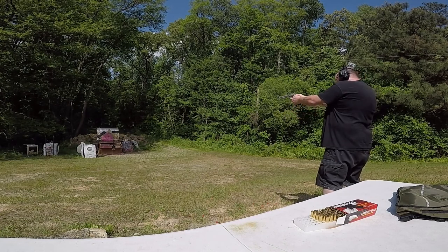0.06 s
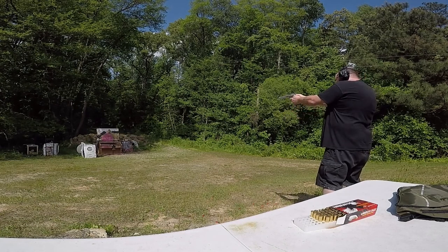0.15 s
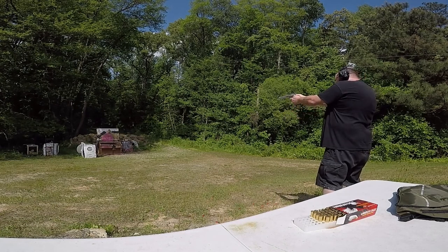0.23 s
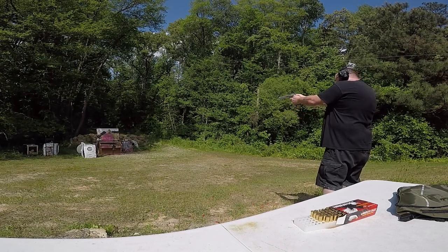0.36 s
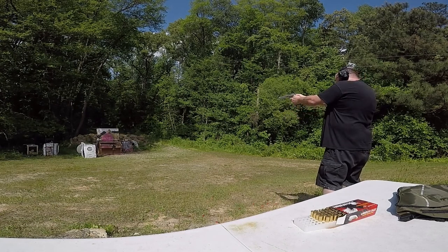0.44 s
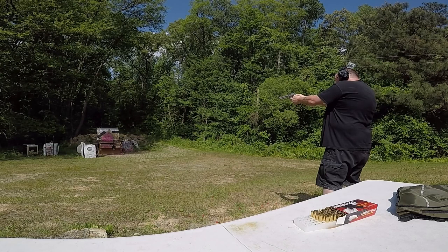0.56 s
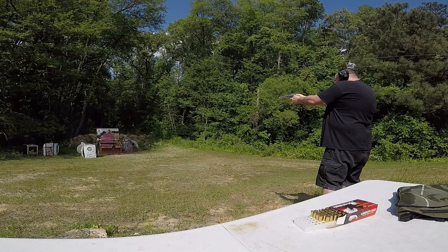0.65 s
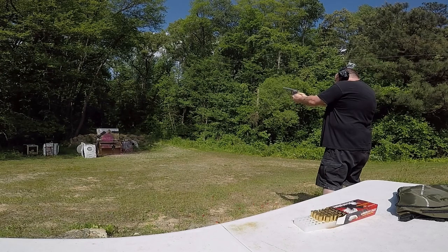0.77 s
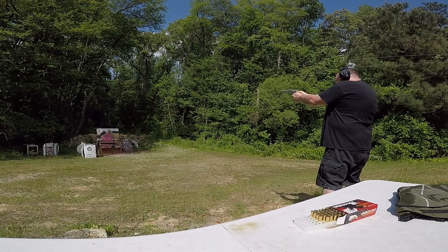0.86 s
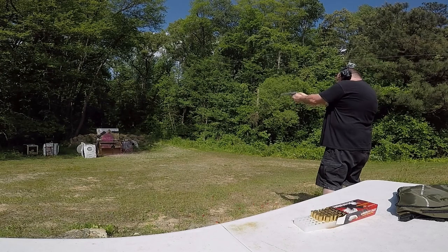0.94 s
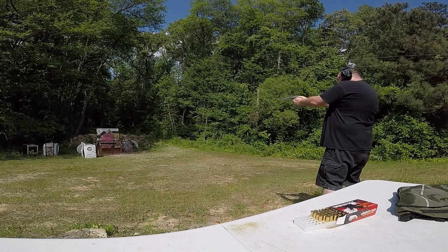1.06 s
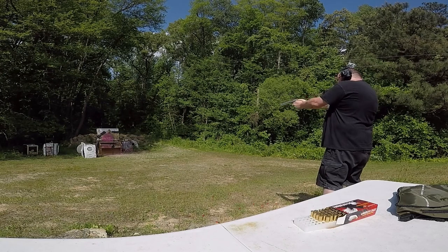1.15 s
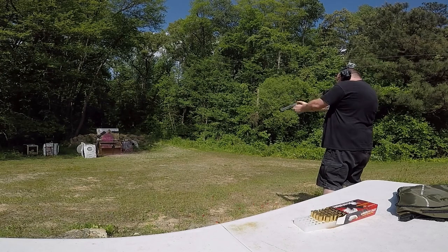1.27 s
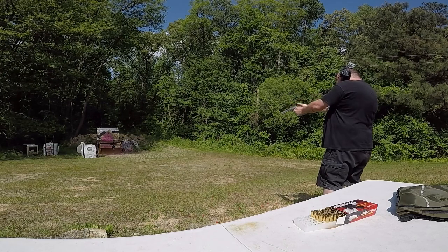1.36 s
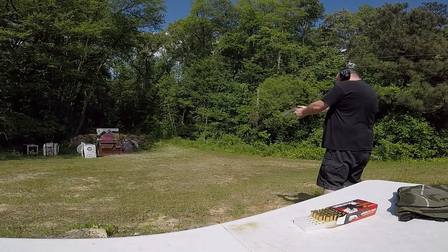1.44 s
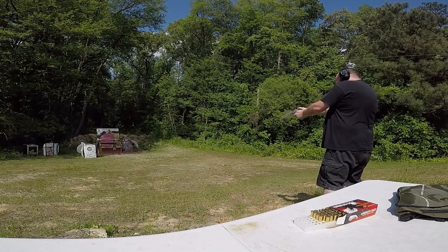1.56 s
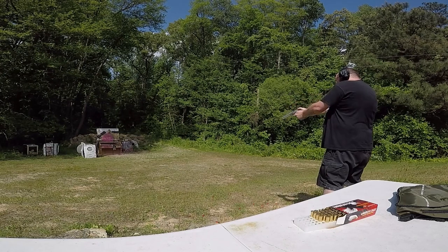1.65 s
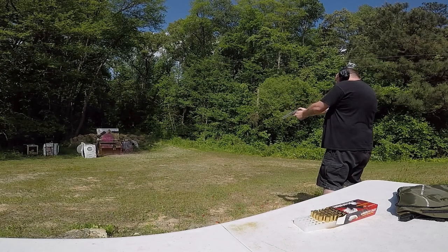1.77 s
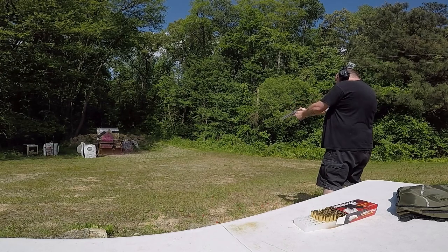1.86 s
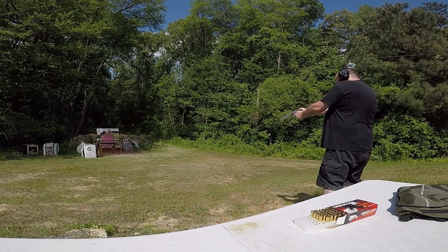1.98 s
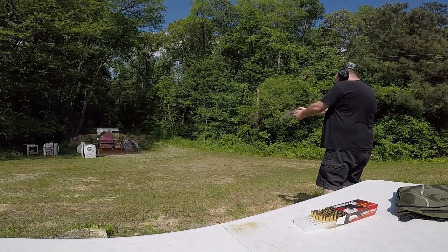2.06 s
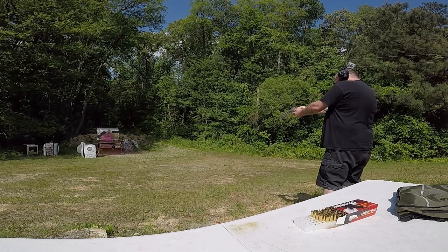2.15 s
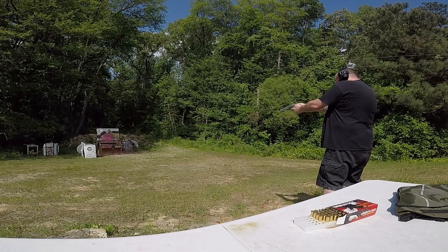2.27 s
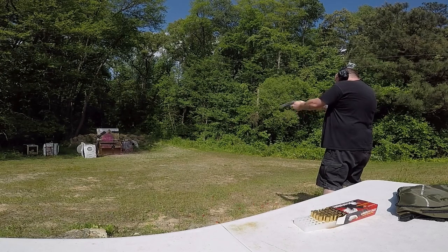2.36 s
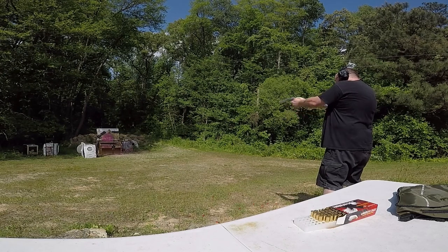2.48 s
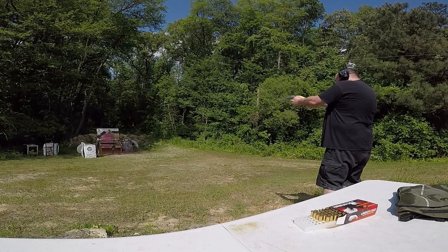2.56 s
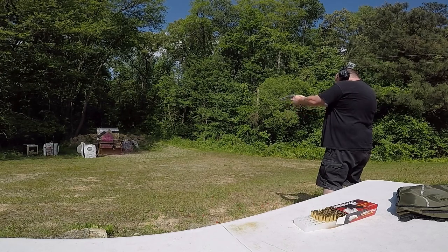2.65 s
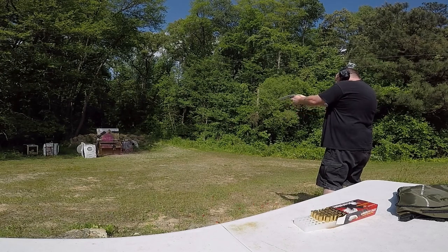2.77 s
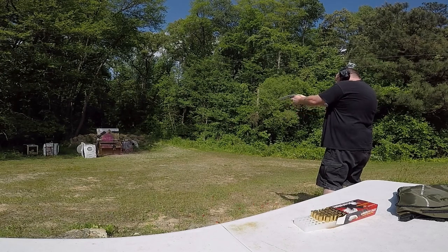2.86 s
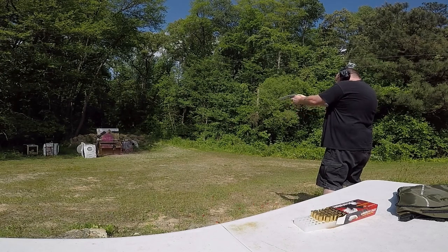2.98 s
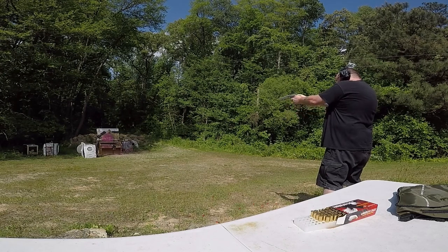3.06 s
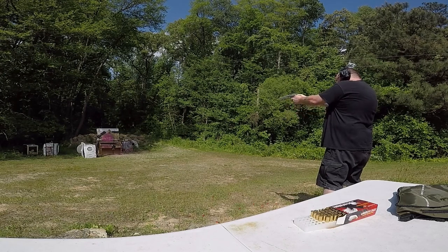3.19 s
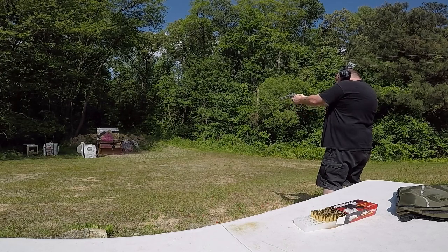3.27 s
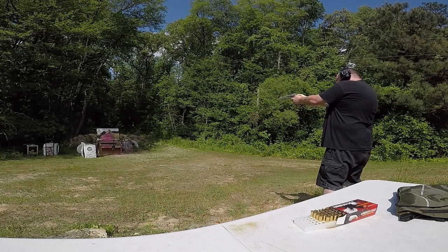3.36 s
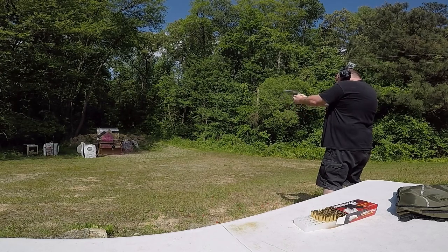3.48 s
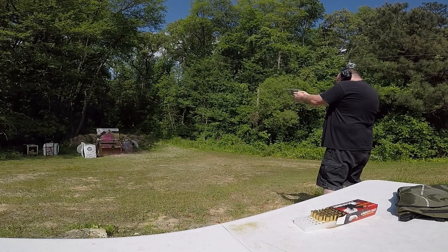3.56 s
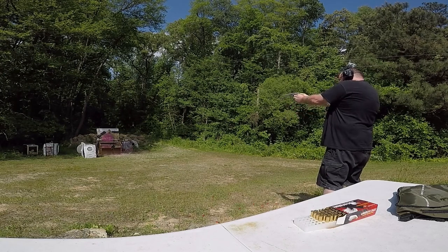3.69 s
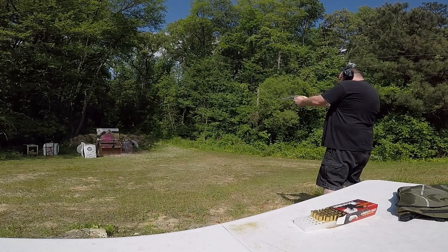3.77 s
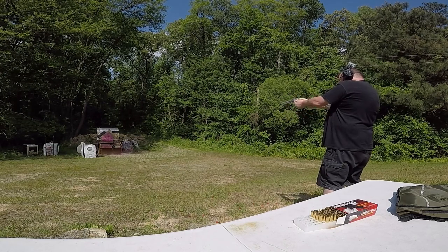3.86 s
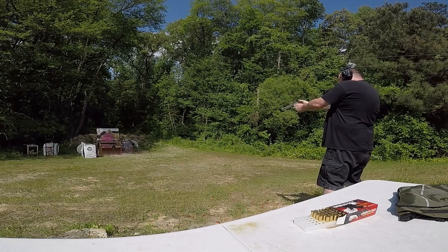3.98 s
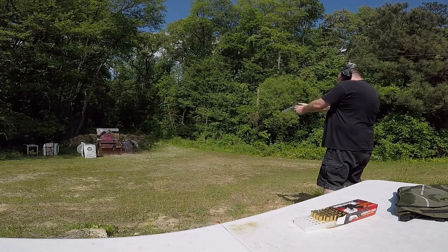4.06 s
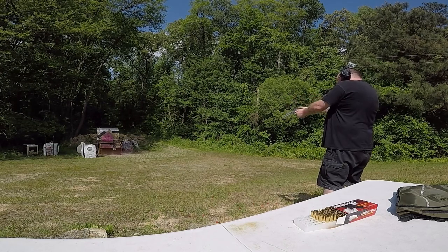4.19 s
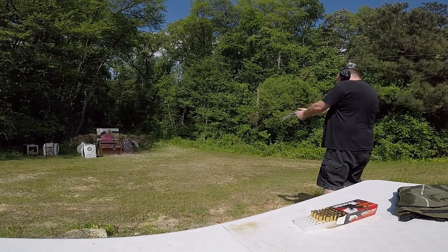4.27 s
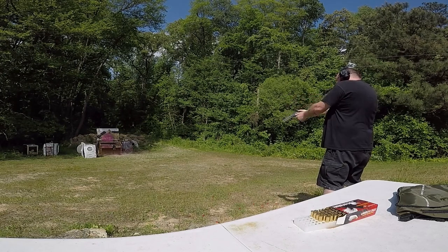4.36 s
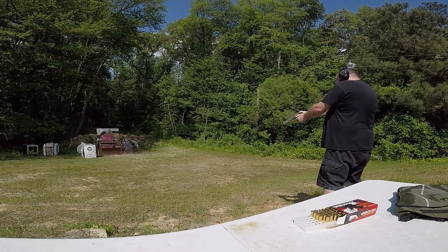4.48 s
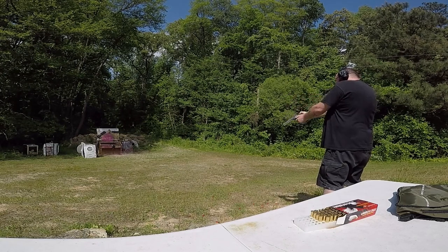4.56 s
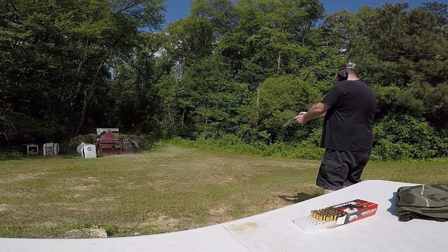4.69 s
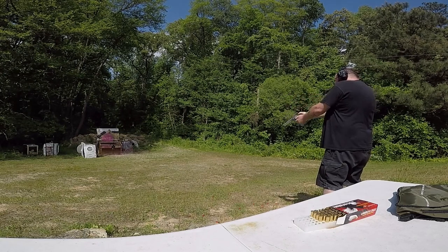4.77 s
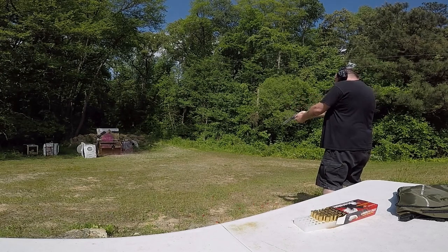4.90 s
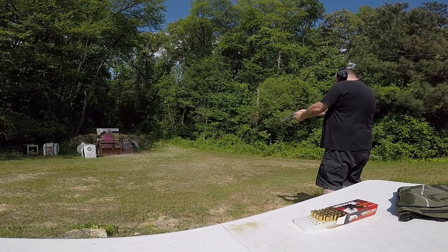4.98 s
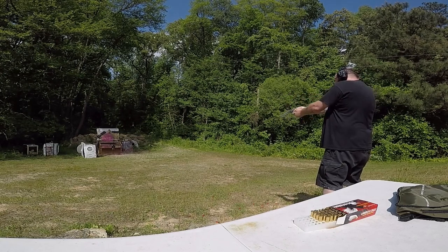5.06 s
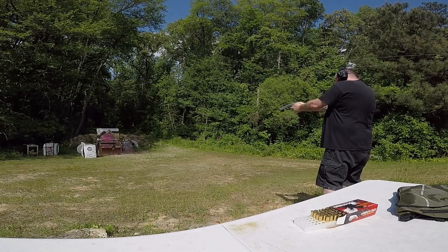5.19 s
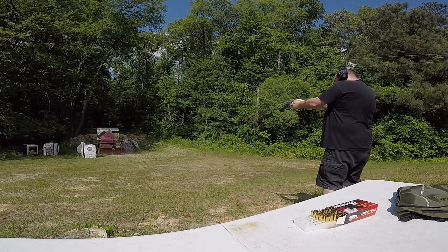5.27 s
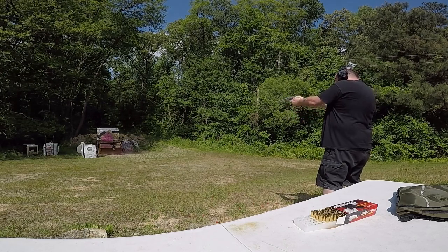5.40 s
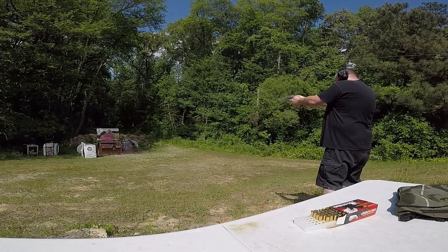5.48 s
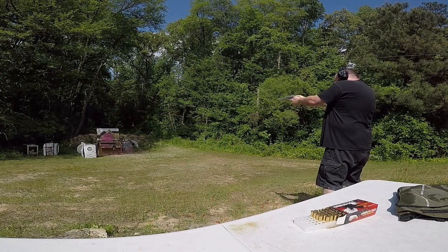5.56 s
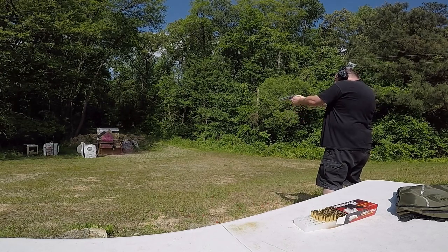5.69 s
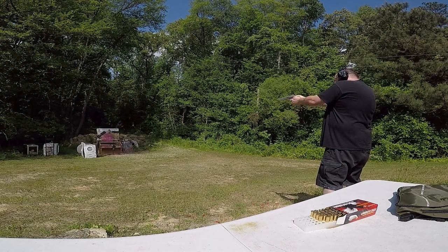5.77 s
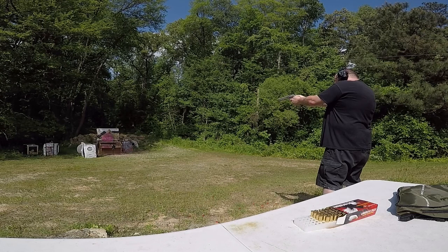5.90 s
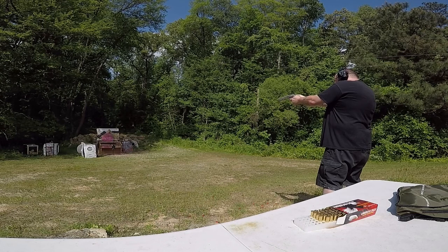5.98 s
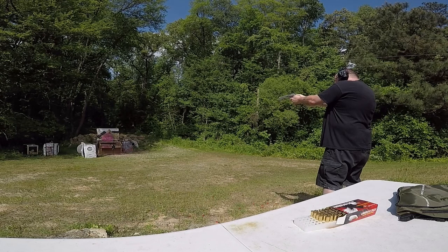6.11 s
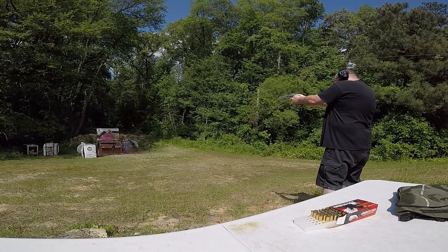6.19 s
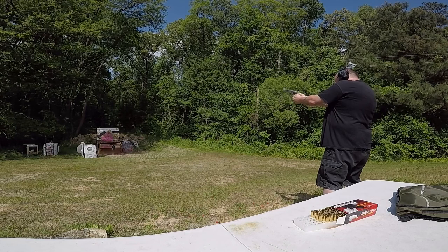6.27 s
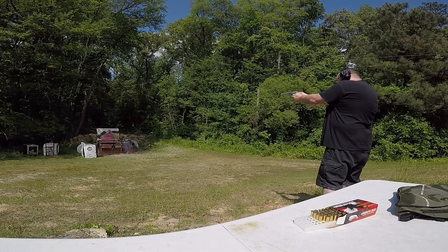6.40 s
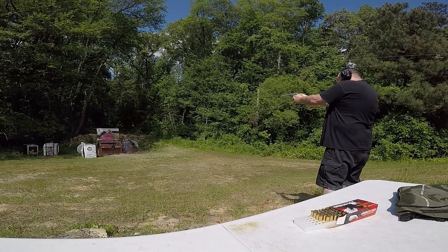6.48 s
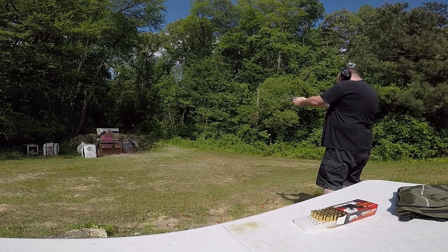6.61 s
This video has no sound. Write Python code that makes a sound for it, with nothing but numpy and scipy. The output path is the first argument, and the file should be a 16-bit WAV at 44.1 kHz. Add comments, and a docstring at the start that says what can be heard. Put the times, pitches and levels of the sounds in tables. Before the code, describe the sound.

A camera microphone a few metres behind a shooter in a grassy clearing. Quiet breeze, then a sharp revolver crack, almost at once a bullet smacking steel, a bright wavering ring and a woodland echo. Wind rumbles and a small hammer click follows. The same shot sequence comes twice more, the last one still fading at the end.

```python
"""Wind touches the microphone over a quiet outdoor hush, and a steel plate still hums from earlier hits.
Then come three revolver shots: a noise crack with a pulse of suction, then a bullet smacking the plate.
The plate rings as a set of beating tones, while trees and deep woods answer with fading noise.
The camera turns itself down at each blast, holds, then climbs back as the woods still echo.
Before the second and third shots, clicks of noise and short tones cock the hammer while gusts come and go."""
import sys
import numpy as np
from scipy import signal
from scipy.fft import rfft, irfft, next_fast_len
from scipy.io import wavfile
from scipy.ndimage import minimum_filter1d

SR = 44100
rng = np.random.default_rng(int(sys.argv[2]) if len(sys.argv) > 2 else 0)


def digitize_waveform(pressure):
    """Quantize a signal to 16-bit integers and store it at the path in sys.argv[1].

    Rows of a 2-D input are taken as channels; values are limited to [-1, 1].
    """
    field = np.atleast_2d(pressure).T
    bounded = np.clip(field, -1, 1)
    quanta = np.round(bounded * 32767).astype(np.int16)
    wavfile.write(sys.argv[1], SR, quanta)


N = 292824  # length in samples


def amp(db):
    """Turn decibels into a plain multiplier."""
    return 10 ** (np.asarray(db) / 20)


def unit(x):
    """Scale a sound to an average strength (rms) of 1."""
    return x / np.sqrt(np.mean(x ** 2) + 1e-20)


def along(points, hz):
    """Read a curve of (f/Hz, value) points, spaced by the log of frequency."""
    f, v = np.transpose(points)
    return np.interp(np.log(hz + 1), np.log(f + 1), v)


def clock(seconds):
    """Sample times from zero."""
    return np.arange(int(seconds * SR)) / SR


def decay(t, t60):
    """Exponential fall from t = 0, losing 60 dB in t60 seconds; silent before."""
    return (t >= 0) * np.exp(-np.log(1000) * np.maximum(t, 0) / t60)


def rise(t, start, length):
    """A smooth step from 0 to 1."""
    return np.sin(np.pi / 2 * np.clip((t - start) / length, 0, 1)) ** 2


def lobe(t, peak):
    """A one-sided pressure pulse that reaches height 1 at peak seconds."""
    u = np.maximum(t, 0) / peak
    return (u * np.exp(1 - u)) ** 2


def add(track, s, sound):
    """Mix a sound in at time s."""
    part = track[round(s * SR):][:len(sound)]
    part += sound[:len(part)]


def noise(spectrum, size):
    """Noise coloured by a spectrum and scaled to rms 1, so only the spectrum's shape counts."""
    m = next_fast_len(size + SR // 8)
    gain = amp(along(spectrum, np.fft.rfftfreq(m, 1 / SR)))
    coloured = irfft(rfft(rng.standard_normal(m)) * gain, m)
    return unit(coloured)[:size]


def scatter(spectrum, t60s, size):
    """A diffuse echo in which each frequency dies at its own speed."""
    hz, t, z = signal.stft(noise(spectrum, size), SR, nperseg=512)
    fading = z * decay(t, along(t60s, hz)[:, None])
    return signal.istft(fading, SR)[1][:size]


def wobble(t, rate):
    """Straight lines between random points of unit spread, rate points a second."""
    knots = rng.standard_normal(int(t[-1] * rate) + 3)
    return np.interp(t * rate, np.arange(len(knots)), knots)


# the three shots: [t/s, blast level/dB, delay until the hit is heard t/s, hit level/dB,
# thump level/dB on top of the common thump level, time from the hit to the ring's swell t/s]
SHOTS = [(.7206, -0.5, .0655, 0, -9, 0.064), (3.4471, -0.5, .065, -0.5, 0, 0.037),
         (6.2384, -0.5, .0652, -0.5, -7.5, 0.018)]
# colour of the muzzle crack: [f/Hz, relative level/dB per Hz]
CRACK_COLOUR = [(30, -6.5), (110, 2.5), (200, 8.5), (300, 4), (550, -4.5), (850, 5.5), (1200, -2.5),
                (1750, 3), (2200, -1.5), (3000, -6.5), (3900, 4), (5500, -9.5), (9000, -13.5),
                (15000, -22.5)]


def shots():
    """Each shot sends its blast and echo at once; the hit and the ring follow after the bullet's flight."""
    out, t, early = np.zeros(N), clock(3), clock(.5)
    pattern = noise(CRACK_COLOUR, len(early))  # the surroundings scatter every blast in much the same way
    for shot, (s, db, flight, hit_db, thump_db, bloom) in enumerate(SHOTS):
        crack = unit(pattern + noise(CRACK_COLOUR, len(early)))
        add(out, s, amp(db) * blast(early, crack))
        add(out, s, amp(db) * echoes(t))
        add(out, s + flight, impact(early, hit_db, thump_db))
        add(out, s + flight, plate(t, shot, bloom))
    return out


# ways the blast reaches us (direct, ground, nearby things), before the shot's own level:
# [delay t/s, level/dB, time to fall 60 dB t/s]
BLAST_PATHS = [(0, 29.5, 0.027), (.0052, 16.5, 0.018), (.009, 18, 0.045), (0.015, 10, .045),
               (0.023, -3, .15)]


def blast(t, crack):
    """The muzzle crack arrives along several paths, over a deep swing of suction."""
    power = sum((amp(db) * decay(t - delay, t60)) ** 2 for delay, db, t60 in BLAST_PATHS)
    suction = amp(24.0) * lobe(t - .002, peak=0.0043) + amp(9.5) * lobe(t - .015, peak=0.0049)
    return np.sqrt(power) * crack - suction


# colour of the bullet's smack: [f/Hz, relative level/dB per Hz]
SMACK_COLOUR = [(100, -14.5), (700, -13.5), (1500, 1), (2400, 4), (3200, -5.5), (4100, -3), (6000, -14.5),
                (15000, -27.5)]
# colour of the flying lead fragments: [f/Hz, relative level/dB per Hz]
SPRAY_COLOUR = [(300, -16.5), (1500, -3), (4500, 1.5), (6500, -3.5), (11000, -5.5), (15000, -15.5)]


def impact(t, hit_db, thump_db):
    """The bullet smacks the plate, shoves it and sprays fragments."""
    smack = amp(11) * decay(t, 0.028) * noise(SMACK_COLOUR, len(t))
    spray = amp(-2.0) * rise(t, 0, 0.0056) * decay(t, 0.3) * noise(SPRAY_COLOUR, len(t))
    shove = amp(16 + thump_db) * lobe(t - .002, peak=0.0012)
    return amp(hit_db) * (smack + spray) - shove


# the plate's tones; each bullet lands on another spot. Levels are before RING_DB, times before DAMPING:
# [f/Hz, time to fall 60 dB t/s, early swell level/dB, level/dB for shot 1, shot 2, shot 3]
PLATE_MODES = [ (550, 9, 0, -50, -46, -46), (936, 6, 0, -39, -43, -40), (1135, 1, 0, -29, -29, -8),
               (1877, 1.8, 4, -8, -9, -11), (2560, 1.4, 2, -31, -27, -16), (3078, 1.45, 8, -10, -10, -17),
               (3270, 1, 6, -32, -20, -22), (3690, 1.3, 2, -6, -12, -24), (3889, 1.3, 10, -18, -16, -32),
               (4996, 1.15, 6, -21, -15, -15), (5068, 1.1, 8, -12, -33, -17), (5636, 1, 12, -27, -20, -12),
               (6152, .95, 11, -28, -24, -30), (6495, .95, 16, -21, -42, -29),
               (7289, .9, 19, -24, -24, -27), (7687, .95, 13, -42, -30, -19), (8105, .9, 11, -28, -31, -30),
               (8350, 1.7, 10, -38, -46, -36), (8780, .8, 9, -29, -23, -27), (9035, 1.2, 7, -18, -38, -20),
               (9630, .7, 8, -40, -21, -40), (9720, .7, 8, -35, -38, -13), (10222, .75, 7, -19, -26, -22),
               (11470, .65, 6, -22, -16, -17), (12170, .55, 6, -22, -42, -40),
               (13340, .6, 5, -40, -42, -24), (14075, .75, 3, -27, -50, -30)]
RING_DB, DAMPING = 0.2, 1.157  # added to every level; the hanger's extra loss, a factor on the decay rate
FLEX_S = .041  # half length of the early swell, where its dB have dropped to 37 %
SWING_S, EDGE_ON_S = .305, .255  # seconds between edge-on moments, and from the hit to one of them
EDGE_LOSS, SWING_T60 = .6, 5.5  # share lost edge-on at t = 0; seconds for that share to fall 60 dB
TWIN, TWIN_SPLIT = .38, .0023  # each tone's weaker twin: relative size, relative detuning
DRIFT = .0005  # relative size of the random pitch waver
FLUTTER_DB, FLUTTER_DB_PER_HZ = 1.43, .00025  # the narrow beams of high modes flutter most


def plate(t, shot, bloom):
    """The modes swell as the plate flexes, beat in close pairs, and fade whenever it swings edge-on."""
    ring = np.zeros(len(t))
    flexing = np.exp(-((t - bloom) / FLEX_S) ** 2)
    edge_on = np.cos(np.pi * (t - EDGE_ON_S) / SWING_S) ** 4
    facing = 1 - np.clip(EDGE_LOSS * decay(t, SWING_T60), 0, .9) * edge_on
    for hz, t60, swell_db, *levels in PLATE_MODES:
        u = t[:int(t60 * SR)]
        cycles = hz * np.cumsum(1 + DRIFT * wobble(u, rate=25)) / SR
        phase = 2 * np.pi * (cycles + rng.random())
        flutter_db = (FLUTTER_DB + FLUTTER_DB_PER_HZ * hz) * wobble(u, rate=np.sqrt(hz) / 4)
        twin_phase = phase + 2 * np.pi * (TWIN_SPLIT * hz * u + rng.random())
        pair = np.sin(phase) + TWIN * np.sin(twin_phase)
        level_db = RING_DB + levels[shot] + swell_db * flexing[:len(u)] + flutter_db
        ring[:len(u)] += amp(level_db) * decay(u, t60 / DAMPING) * pair
    return ring * facing * rise(t, 0, 0.72 * bloom)


# colour of the near tree line's echo: [f/Hz, relative level/dB per Hz]
TREES_COLOUR = [(30, -1.5), (70, 0.5), (150, 2.5), (300, 1), (800, -0.5), (1300, -5.5), (2500, -6.5),
                (4500, -4.5), (6000, -14.5), (10000, -17.5), (15000, -29.5)]
# how long that echo lasts: [f/Hz, time to fall 60 dB t/s]
TREES_FADE = [(50, 0.53), (150, 0.8), (500, 0.95), (4000, 0.79), (12000, 0.58)]
# colour of the deep woods' echo: [f/Hz, relative level/dB per Hz]
WOODS_COLOUR = [(40, -7), (130, -23), (220, -11.5), (400, -2), (700, -0.5), (1200, -6), (2500, -6.5),
                (4500, -1), (6000, -8), (10000, -14), (15000, -29)]
# how long that echo lasts: [f/Hz, time to fall 60 dB t/s]
WOODS_FADE = [(100, 2.11), (400, 3.72), (800, 3.25), (2000, 2.29), (4000, 1.44), (8000, 1.035),
              (14000, 0.93)]


def echoes(t):
    """The tree line answers faster; the deep woods build up slowly and roll on, losing their treble."""
    near = amp(2.5) * rise(t, 0.036, 0.074) * scatter(TREES_COLOUR, TREES_FADE, len(t))
    far = amp(-12.5) * rise(t, 0.035, 0.17) * scatter(WOODS_COLOUR, WOODS_FADE, len(t))
    clumps_db = 0.44 * wobble(t, rate=26)  # trees stand in clumps
    return (near + far) * amp(clumps_db)


# the hammer is thumbed back; the level is before CLICK_LIFT_DB:
# [time it locks t/s, level of that click/dB, length of the pull t/s]
COCKING = [(1.862, -31, .054), (4.5853, -38, .063)]
# colour of each click: [f/Hz, relative level/dB per Hz]
CLICK_COLOUR = [(1000, -30), (3000, -25), (4200, 9.5), (6000, -8), (7500, -4), (10000, -7), (13000, -12),
                (16000, -19)]
# the revolver frame's tones, relative to the click: [f/Hz, level/dB, time to fall 60 dB t/s]
FRAME_MODES = [(2540, -14.5, 0.018), (4260, -7, 0.013), (6440, -20, 0.038), (9800, -9, 0.018)]
CLICK_LIFT_DB = 3  # added to every click level here
NOTCH_DB = -52.5  # the first notch, as the pull starts
STOP_DB, STOP_LEAD = -50, 0.3  # the cylinder stop drops in with this share of the pull to go
SETTLE_DB, SETTLE_S = -52, .0095  # the hammer settles this many seconds after locking


def cocking():
    """Each pull clicks four times: first notch, cylinder stop, full cock, settling; the frame rings faintly."""
    out, t = np.zeros(N), clock(.2)
    for locked, lock_db, pull in COCKING:
        clicks = [(-pull, NOTCH_DB), (-STOP_LEAD * pull, STOP_DB), (0, lock_db), (SETTLE_S, SETTLE_DB)]
        for delay, db in clicks:
            fading = decay(t, 0.0071) + amp(-22) * decay(t, 0.098)
            sound = fading * noise(CLICK_COLOUR, len(t))
            for hz, level, t60 in FRAME_MODES:
                strength = amp(level + rng.normal(0, 0.78))  # every click differs a little
                sound += strength * decay(t, t60) * np.sin(2 * np.pi * hz * t)
            add(out, locked + delay, amp(db + CLICK_LIFT_DB) * sound)
    return out


# plate tones still sounding from earlier hits: [f/Hz, level/dB at the start, time to fall 60 dB t/s]
LINGERING = [(549.5, -59.5, 14), (1630, -74.5, 13)]


def lingering():
    """The steel has not quite come to rest before the first shot, so two fading tones hum on."""
    t = np.arange(N) / SR
    return sum(amp(db) * decay(t, t60) * np.sin(2 * np.pi * hz * t) for hz, db, t60 in LINGERING)


# gusts on top of the breeze, before the random eddies:
# [time of the peak t/s, level/dB, half length to 37 % t/s]
GUSTS = [(1.85, -31.5, .13), (2.12, -27.5, .15), (2.62, -28.5, .18), (3.17, -38, 0.24), (4.83, -39, 0.11),
         (5.68, -41.5, .13)]
# colour of the wind's rumble: [f/Hz, relative level/dB per Hz]
RUMBLE_COLOUR = [(8, 5), (18, 14.5), (35, -9.5), (55, -24), (90, -33), (200, -51), (600, -90.5)]
# colour of the low buffeting: [f/Hz, relative level/dB per Hz]
BUFFET_COLOUR = [(12, -14), (28, 1.5), (45, -3.5), (70, -21), (110, -38), (300, -70)]
# colour of the outdoor hush: [f/Hz, relative level/dB per Hz]
HUSH_COLOUR = [(40, -19), (90, -10.5), (190, -18.5), (300, -15), (550, -13.5), (950, -19.5), (1500, -23),
               (2400, -29), (4700, -29), (6000, -38.5), (10000, -41), (15000, -41.5)]
CALM_DB = -48.5  # the breeze between gusts, before the eddies
EDDY_DB, EDDIES_PER_S = 2.5, 6.1  # the wind's random unsteadiness
BUFFET_DB, BUFFET_GROWS = -10, 2.4  # buffeting against rumble at the strongest flow; power it grows by


def air():
    """Gusts swell and fade on the microphone, the stronger ones buffeting it, over a quiet outdoor hush."""
    t = np.arange(N) / SR
    flow = amp(CALM_DB) + sum(amp(db) * np.exp(-((t - s) / half) ** 2) for s, db, half in GUSTS)
    strongest = flow.max()
    buffet_level = amp(BUFFET_DB) * strongest * (flow / strongest) ** BUFFET_GROWS
    wind = flow * noise(RUMBLE_COLOUR, N) + buffet_level * noise(BUFFET_COLOUR, N)
    eddies = amp(EDDY_DB * wobble(t, rate=EDDIES_PER_S))
    return wind * eddies + amp(-58.5) * noise(HUSH_COLOUR, N)


def scene():
    """Shots, steel, lockwork and wind at one microphone."""
    return (shots() + lingering() + cocking() + air())[None]


def ducking(x, depth_db=19.0, hold=0.32, release_db=24, easing=1.6):
    """Gain control: drops at once on overload, holds, then climbs back, slowing as it nears full gain."""
    need = np.clip(20 * np.log10(np.abs(x) + 1e-9), 0, depth_db)
    size = int(hold * SR)  # hold is in seconds
    held = -minimum_filter1d(-need, size, origin=(size - 1) // 2, mode="constant")
    ramp = release_db * np.arange(N) / SR  # dB per second, before the easing bends it
    cut = np.abs(np.maximum.accumulate(held + ramp) - ramp)
    return amp(-depth_db * (cut / depth_db) ** easing)


def record(dry):
    """The camera ducks and softly clips; its coupling capacitor rebounds after each blast; the top is cut."""
    x = dry[0] * ducking(dry[0])
    x = x / (1 + x ** 4) ** .25
    x = signal.lfilter(*signal.butter(1, 1.6, "high", fs=SR), x)
    m = next_fast_len(N + SR // 2)
    passband = 1 - rise(np.fft.rfftfreq(m, 1 / SR), 14900, 1200)  # fades out from 14900 to 16100 Hz
    return irfft(rfft(x, m) * passband, m)[None, :N]


dry = scene()
out = record(dry)
digitize_waveform(out)
```